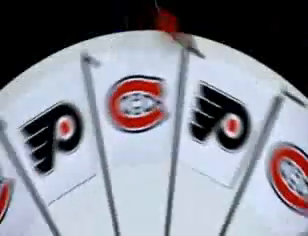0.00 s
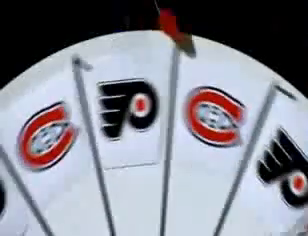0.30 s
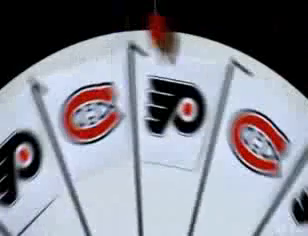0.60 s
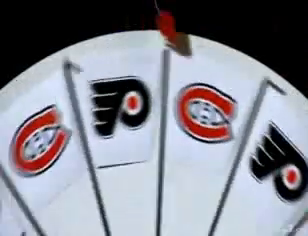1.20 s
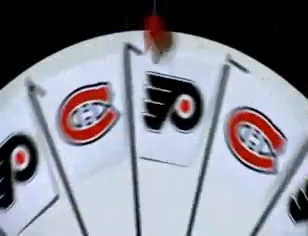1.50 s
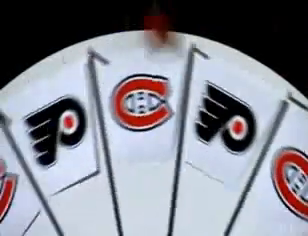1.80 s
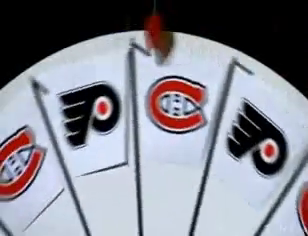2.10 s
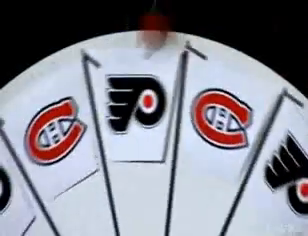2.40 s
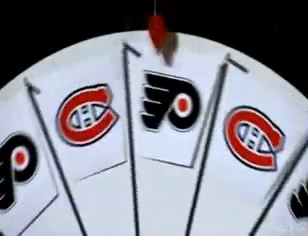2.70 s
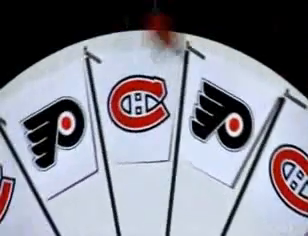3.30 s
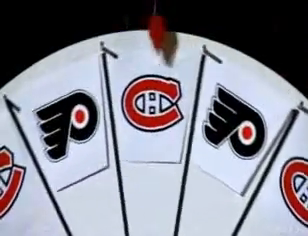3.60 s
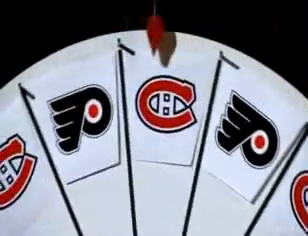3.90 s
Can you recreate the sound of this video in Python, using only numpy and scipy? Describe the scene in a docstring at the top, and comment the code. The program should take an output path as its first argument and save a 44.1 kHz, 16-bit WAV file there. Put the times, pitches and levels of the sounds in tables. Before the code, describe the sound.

Sharp clacks of a springy pointer hitting pegs come at growing gaps as a prize wheel slows. Light taps and faint crackly rubbing fall between them, heard close in a quiet room, before the wheel comes to rest.

```python
"""A prize wheel turns in a quiet room. A peg clacks against a springy plastic pointer and the disc rings; the
pointer slips off, ticks and taps back. This happens at ever longer gaps, while pegs rub, the pivot squeaks
twice and the axle knocks softly. After about three seconds the wheel stops; a few tiny ticks still follow. All
along, a coarse digital recorder turns faint sounds into gritty crackle and the faintest to silence."""
import sys
import numpy as np
from scipy import signal
from scipy.fft import rfft, irfft
from scipy.io import wavfile
from scipy.ndimage import uniform_filter1d

SR = 44100
rng = np.random.default_rng(int(sys.argv[2]) if len(sys.argv) > 2 else 0)


def transcribe(u):
    """Save the signal u as a 16-bit wav file named by the first command-line argument.

    u: samples, shape (n,) or (channels, n), limited to [-1, 1]; the rate is SR.
    q: integer samples, one column per channel.
    """
    v = np.clip(np.atleast_2d(u).T, -1, 1)
    q = np.round(v * 32767).astype(np.int16)
    wavfile.write(sys.argv[1], SR, q)


N = 176400

# pitches at which the struck pointer rings: (pitch [Hz], width [Hz], level [dB])
POINTER_RESONANCES = [(795, 120, -0.5), (1134, 390, -4), (1506, 300, -3.5), (2120, 290, 0),
                      (2523, 680, -2.5), (2948, 300, 1.5), (3632, 150, -3), (4320, 100, -4.5),
                      (4512, 100, -4), (5110, 690, -12), (6180, 700, -13.5), (6944, 2700, -19)]
# tones of the knocked axle: (pitch [Hz], level [dB], time to fade by 60 dB [s])
AXLE_TONES = [(192.45, 0.5, 0.072), (424.2, -1, 0.031), (900, -10, 0.0067)]
# tone colour of rubbing and rumbling: (frequency [Hz], level [dB])
RUB_SPECTRUM = [(40, -4), (90, 3.5), (180, 2.5), (400, 0.5), (900, -0.5), (2200, -9), (4500, -13.5),
                (10000, -23.5)]
WIRE_HZ, WIRE_WIDTH_HZ = 8830, 330   # the ping of the pointer's wire


def peg_strikes():
    """Each hit of a peg clacks the pointer, pings its wire and sets the wheel's disc ringing."""
    # pegs hit the pointer, each hit favouring two pitches: (time [s], rise [s], level [dB],
    # low pitch [Hz], high pitch [Hz], extra ping [dB], extra disc ring [dB], treble tilt [dB per octave])
    hits = [(0.1676, .0027, -18.5, 2303, 3480, 2.5, 1, 0.5),
            (0.1826, 0.0013, -28.5, 996, 3060, -10, -2.5, -2.5),
            (.1900, 0.0016, -32, 1484, 2360, -2.5, -3.5, 0), (0.5998, 0.0023, -20, 2195, 2785, -11, 4, 1),
            (0.6264, 0.0015, -22, 887, 3410, 6, 0.5, 0.5),
            (1.0727, .002, -26.5, 2290, 3000, -20.5, -2.5, -1.5),
            (1.1091, 0.0028, -20, 1600, 3420, 4.5, 2.5, 1.5),
            (1.1183, 0.0023, -24.5, 2237, 3230, -20.5, -8, -2.5),
            (1.6317, 0.002, -22, 1877, 2750, -8.5, 3.5, 2), (1.6627, 0.0016, -21.5, 1260, 4210, -3, 1.5, 3),
            (1.6710, 0.0021, -27.5, 2480, 3560, 8, -5, -5), (2.3606, 0.0012, -34, 1880, 2910, -9, 1, 1),
            (2.3884, .0038, -29, 600, 2847, -22, 3, 0.5)]
    # tones of the disc: (pitch [Hz], level [dB], time to fade by 60 dB [s])
    disc_tones = [(175, -29, 0.14), (248.5, -27.5, 0.097), (347.2, -18, 0.097), (378.4, -33.5, .55),
                  (427.4, -29, 0.16), (623, -40, 0.44), (812, -34.5, .25), (1048, -35, 0.11)]
    judder_width_hz, judder_db, ping_db = 200, 2, -17
    out = np.zeros(N)
    for s, rise_s, db, low_hz, high_hz, extra_ping_db, disc_db, tilt_db in hits:
        force = contact(rise_s, decay_s=0.002)
        judder = resonate(force, low_hz, judder_width_hz) + resonate(force, high_hz, judder_width_hz)
        push = tilt(force + from_db(judder_db) * judder, tilt_db)
        clack = peak_one(body(push, POINTER_RESONANCES))
        ping = from_db(ping_db + extra_ping_db) * peak_one(resonate(force, WIRE_HZ, WIRE_WIDTH_HZ))
        add(out, s, from_db(db) * (clack + ping))
        add(out, s + rise_s / 2, from_db(db + disc_db) * ring(disc_tones))
    return out


def pointer_swings():
    """The freed pointer ticks at the end of its swing, then taps back and nudges the axle."""
    # ticks at the far end of the swing: (time [s], level [dB])
    ticks = [(.2700, -45.5), (0.7122, -46), (1.2151, -42.5), (1.789, -51)]
    # taps on the way back: (time [s], level [dB], treble tilt [dB per octave])
    taps = [(0.335, -36, 0.5), (0.7997, -35.5, 2), (1.3021, -34, 1), (1.899, -33, 2), (2.7673, -35.5, 3)]
    # pitches at which the softly touched pointer rings: (pitch [Hz], width [Hz], level [dB])
    soft_resonances = [(233, 56, 0.5), (905, 250, -1), (1340, 340, -3.5), (1747, 250, -4.5),
                       (2098, 330, -3), (2638, 400, -6), (4050, 400, -13)]
    pointer_and_wire = POINTER_RESONANCES + [(WIRE_HZ, WIRE_WIDTH_HZ, 0)]
    rise_s, nudge_db = 0.0008, -16
    out = np.zeros(N)
    for s, db in ticks:
        force = contact(rise_s, decay_s=0.00092)
        add(out, s, from_db(db) * peak_one(body(force, pointer_and_wire)))
    for s, db, tilt_db in taps:
        force = tilt(contact(rise_s, decay_s=0.001), tilt_db)
        add(out, s, from_db(db) * peak_one(body(force, soft_resonances)))
        add(out, s, from_db(db + nudge_db) * ring(AXLE_TONES))
    return out


def friction():
    """Pointer, spring and pegs rub in short spells, and the pointer's pivot gives two thin squeaks."""
    # spells of rubbing: (time [s], length [s], level [dB], hiss compared with the rub [dB])
    rubs = [(.0, 0.048, -68, -14.5), (.163, 0.012, -55.5, -23), (0.196, 0.18, -58, -13.5),
            (0.354, .14, -69.5, -7), (.587, 0.035, -55.5, -22), (.65, .18, -60.5, -9.5),
            (0.839, 0.085, -66.5, -7.5), (0.953, .11, -68.5, -3.5), (1.062, 0.031, -69, 2),
            (1.144, .19, -58.5, -14.5), (1.34, .20, -64, -20), (1.627, 0.0064, -57.5, -16),
            (1.656, 0.27, -57, -18.5), (1.964, .16, -67.5, -7.5), (2.229, 0.088, -66, -14),
            (2.354, 0.0042, -64.5, -10), (2.379, 0.053, -56.5, -5.5), (2.428, 0.12, -73, -10.5),
            (2.743, 0.056, -54, -18.5), (2.80, 0.093, -68.5, -5.5)]
    # squeaks of the pivot: (time [s], length [s], pitch [Hz], level [dB])
    squeaks = [(1.456, 0.073, 4180, -64.5), (1.668, 0.097, 4400, -58)]
    rub = noise(RUB_SPECTRUM, N)
    hiss = rms_one(resonate(rng.standard_normal(N), hz=4052, width_hz=1700))
    out = np.zeros(N)
    for s, length_s, db, hiss_db in rubs:
        out += from_db(db) * spell(s, length_s) * (rub + from_db(hiss_db) * hiss)
    for s, length_s, hz, db in squeaks:
        squeak = rms_one(resonate(rng.standard_normal(N), hz, width_hz=250))
        out += from_db(db) * spell(s, length_s) * squeak
    return out


def axle():
    """The bearing rumbles until the wheel stops, and the axle gives a few dull knocks."""
    # soft knocks: (time [s], level [dB])
    knocks = [(.414, -57.5), (0.89, -56.5), (1.024, -65), (1.982, -57), (2.05, -64), (2.075, -61.5),
              (2.503, -54), (2.624, -58), (2.829, -58), (2.857, -63.5), (2.894, -53)]
    rumble_db, stop_s = -78.5, 3.1
    out = from_db(rumble_db) * noise(RUB_SPECTRUM, N) * (seconds(N) < stop_s)
    for s, db in knocks:
        add(out, s, from_db(db) * ring(AXLE_TONES))
    return out


def stray_ticks():
    """Tiny ticks, each a single sample long, break the silence."""
    # lone ticks in the pauses: (time [s])
    tick_times = [.571, 1.571, 2.173, 2.610, 2.682, 2.704, 2.719, 2.968, 3.112, 3.818, 3.873]
    out = np.zeros(N)
    for s in tick_times:
        add(out, s, -from_db(-44) * np.ones(1))
    return out


def room(x):
    """The sound arrives directly, bounces off two walls of the wheel's stand and dies away in the room."""
    # bounces off the stand: (delay [s], level [dB])
    echoes = [(.0046, -12.5), (.0092, -18)]
    # tone colour of the room's fading tail: (frequency [Hz], level [dB])
    tail_spectrum = [(40, -7), (100, 5), (200, -2), (500, -3.5), (1500, -2.5), (4000, -7), (10000, -7)]
    fade_s, tail_db = 0.36, -19   # the tail falls by 60 dB in fade_s
    t = seconds(SR)
    after_first_echo = t > echoes[0][0]
    tail = noise(tail_spectrum, len(t)) * np.exp(-np.log(1000) * t / fade_s) * after_first_echo
    response = from_db(tail_db) * tail / np.sqrt(np.sum(tail ** 2))
    response[0] = 1   # the direct sound
    for delay_s, db in echoes:
        response[int(delay_s * SR)] += from_db(db)
    return signal.fftconvolve(x, response)[:N]


def contact(rise_s, decay_s):
    """Plastic judders over a peg: a rough force that swells and breaks off."""
    t = seconds(2048)
    envelope = np.minimum(t / rise_s, 1) ** 0.94 * np.exp(-np.maximum(t - rise_s, 0) / decay_s)
    spectrum = rfft(envelope * rng.standard_normal(len(t)))
    even_spectrum = spectrum / (abs(spectrum) + 1e-12)   # every pitch equally strong
    return irfft(even_spectrum) * np.sqrt(envelope)


def body(x, resonances, least_width_hz=160):
    """A pushed object rings at several pitches at once; every second one is flipped in sign."""
    return sum((-1) ** k * from_db(db) * resonate(x, hz, max(width_hz, least_width_hz))
               for k, (hz, width_hz, db) in enumerate(resonances))


def ring(tones, scatter_db=3.5):
    """The tones of a struck object die away, their strengths a little different at each blow."""
    t = seconds(SR)
    out = np.zeros(len(t))
    for k, (hz, db, fade_s) in enumerate(tones):
        level_db = db + scatter_db * rng.standard_normal() - 60 * t / fade_s
        out += (-1) ** k * from_db(level_db) * np.sin(2 * np.pi * hz * t)
    return out


def resonate(x, hz, width_hz):
    """Let through a band around one pitch; the narrower it is, the longer it rings."""
    r = np.exp(-np.pi * width_hz / SR)
    feedback = [1, -2 * r * np.cos(2 * np.pi * hz / SR), r * r]
    return signal.lfilter([(1 - r * r) / 2, 0, (r * r - 1) / 2], feedback, x + 1e-18)


def tilt(x, db_per_octave):
    """Brighten or dull a short sound, leaving 2 kHz as it is."""
    hz = np.fft.rfftfreq(len(x), 1 / SR)
    octaves = np.log2(np.maximum(hz, 500) / 2000)
    return irfft(rfft(x) * from_db(db_per_octave * octaves))


def noise(spectrum, size):
    """Noise with the given tone colour and an average strength of 1."""
    hz, db = np.transpose(spectrum)
    log_hz = np.log(np.fft.rfftfreq(size, 1 / SR) + 1)
    gain = from_db(np.interp(log_hz, np.log(hz), db))
    return rms_one(irfft(rfft(rng.standard_normal(size)) * gain, size))


def spell(s, length_s, fade_s=0.005):
    """A volume curve that fades in, holds and fades out."""
    t = seconds(N)
    return np.clip(np.minimum(t - s, s + length_s - t) / fade_s + .5, 0, 1)


def peak_one(x):
    """Scale so that the loudest millisecond has an amplitude of 1."""
    return x / np.sqrt(2 * uniform_filter1d(x ** 2, size=44).max())


def rms_one(x):
    """Scale to an average strength (rms) of 1."""
    return x / np.sqrt(np.mean(x ** 2) + 1e-20)


def from_db(db):
    """Turn decibels into a volume factor."""
    return 10 ** (np.asarray(db) / 20)


def seconds(size):
    """The time of each sample."""
    return np.arange(size) / SR


def add(out, s, sound):
    """Mix a sound in, starting at s seconds."""
    start = int(s * SR)
    out[start:start + len(sound)] += sound[:len(out) - start]


def scene():
    """Wheel and pointer, heard from close by in one channel."""
    return (room(peg_strikes() + pointer_swings()) + axle() + friction())[None]


def record(dry):
    """A coarse recorder rounds the wave to steps, dulls the treble and adds ticks; a faint low noise lies
    underneath."""
    # tone colour of the background noise: (frequency [Hz], level [dB])
    floor_spectrum = [(20, -7.5), (37, -6), (90, -9.5), (200, -32), (600, -39.5), (2000, -57.5),
                      (10000, -72.5)]
    step, offset = 0.0048, 0.00524   # as parts of full scale
    rest_margin = 0.19   # silence sits this part of a step above the nearest jump
    soften_treble = signal.butter(1, 9000, fs=SR, output="sos")
    cut_treble = signal.ellip(10, .1, 80, 10150, fs=SR, output="sos")
    half_rate = signal.resample_poly(dry[0], 1, 2)
    stepped = step * np.floor(half_rate / step + rest_margin)
    x = signal.resample_poly(stepped, 2, 1)[:N] + stray_ticks()
    x = signal.sosfilt(soften_treble, x) + from_db(-86.5) * noise(floor_spectrum, N)
    return (signal.sosfilt(cut_treble, x) + offset)[None]


dry = scene()
out = record(dry)
transcribe(out)
```